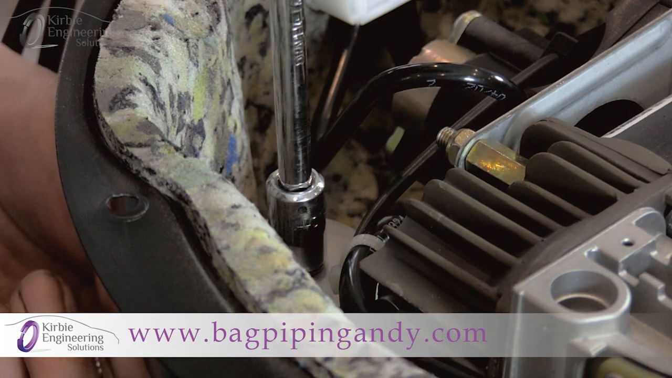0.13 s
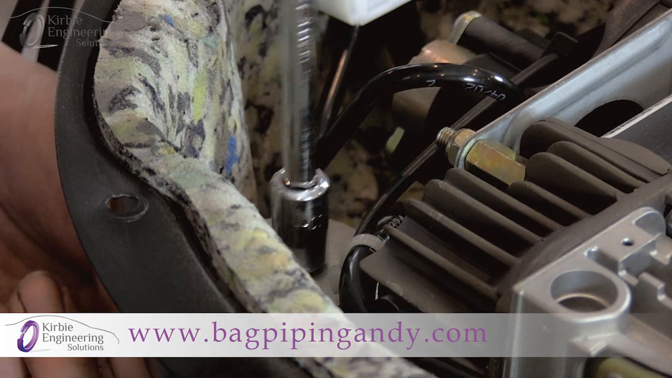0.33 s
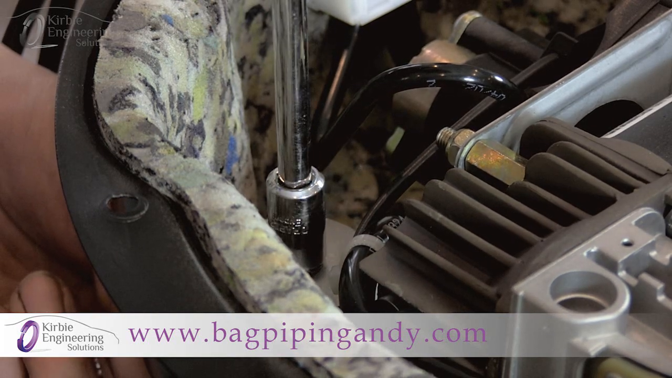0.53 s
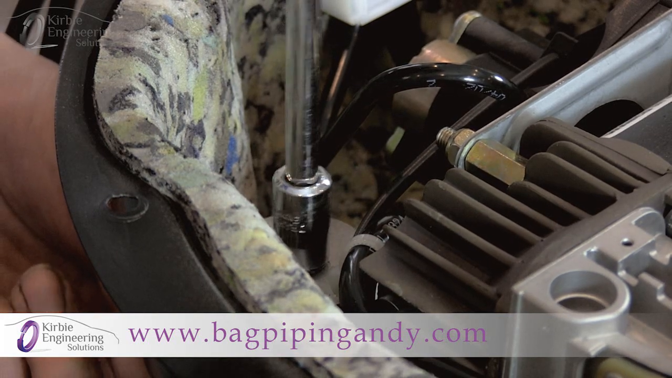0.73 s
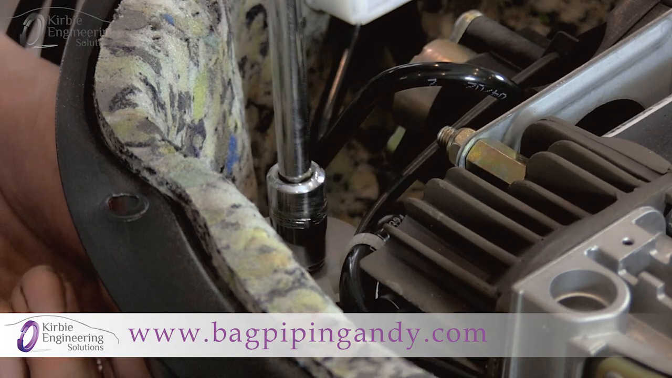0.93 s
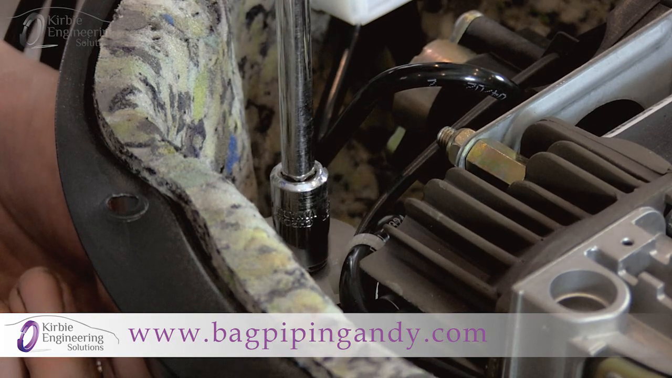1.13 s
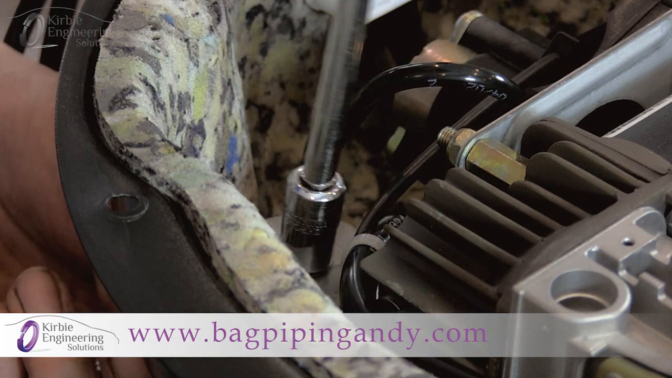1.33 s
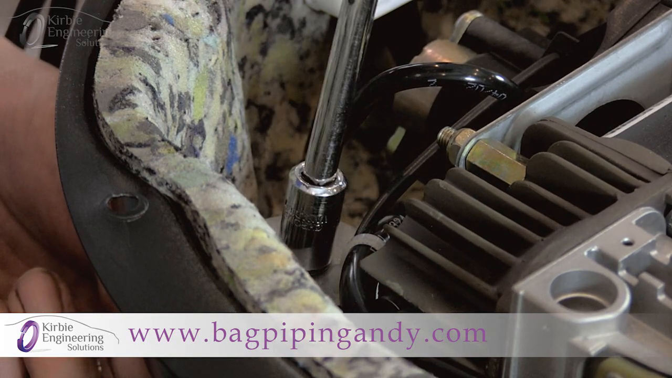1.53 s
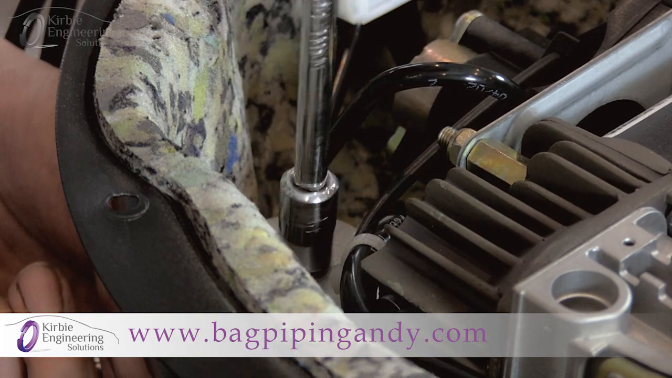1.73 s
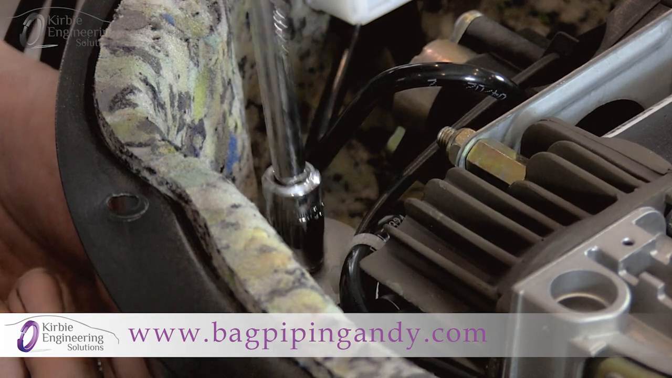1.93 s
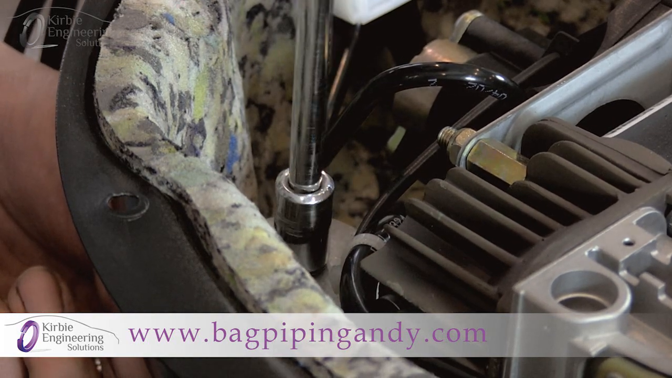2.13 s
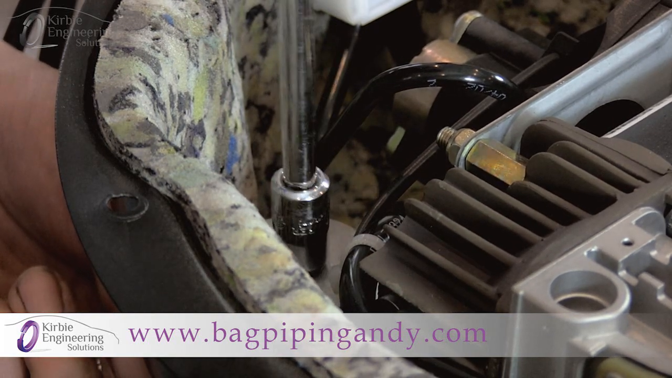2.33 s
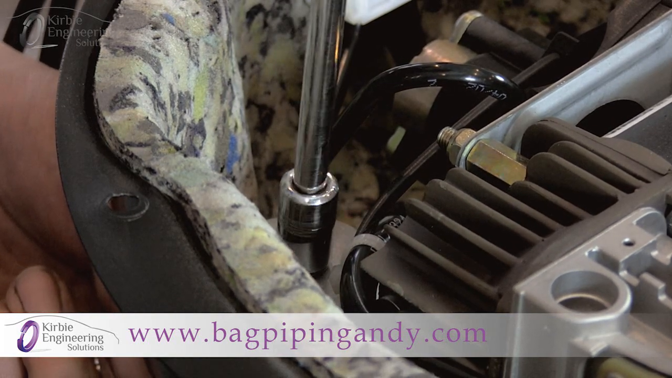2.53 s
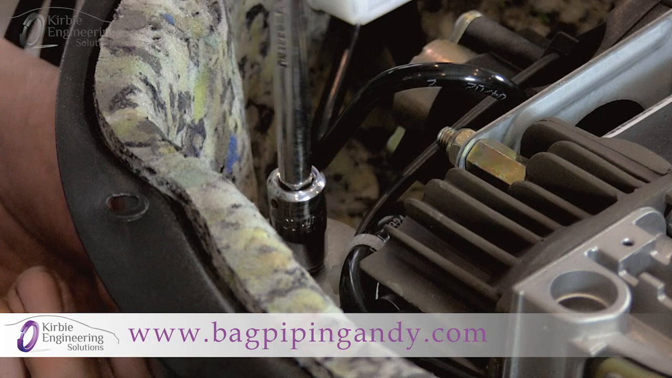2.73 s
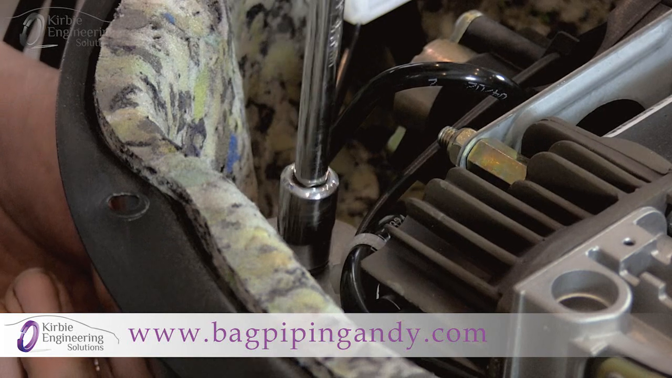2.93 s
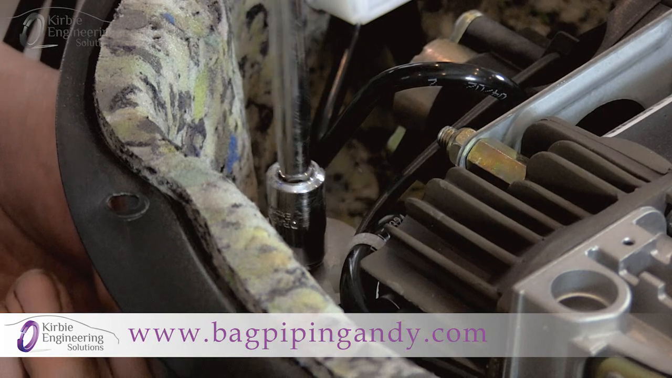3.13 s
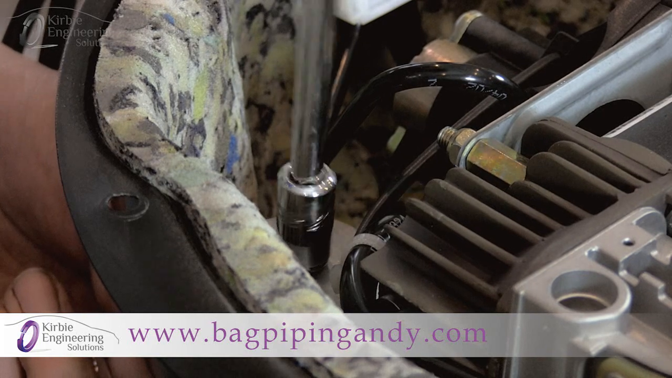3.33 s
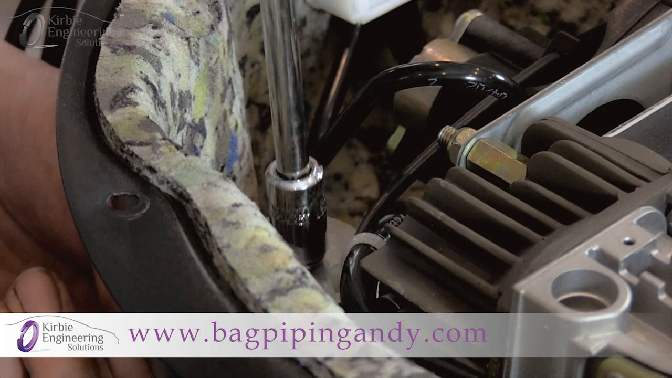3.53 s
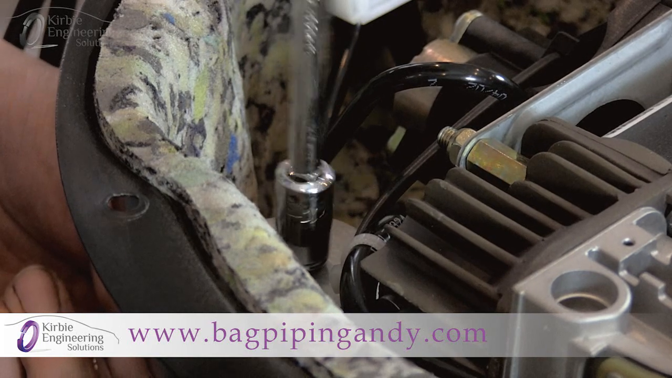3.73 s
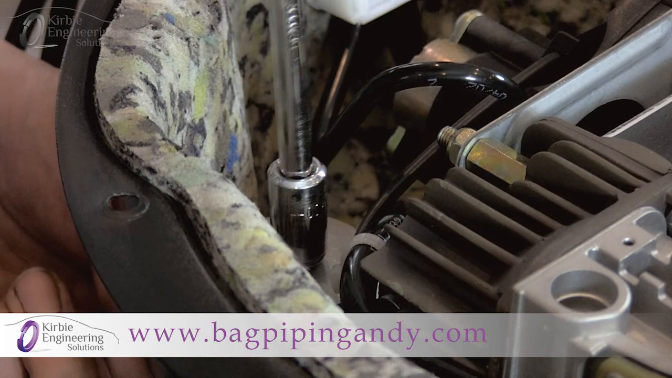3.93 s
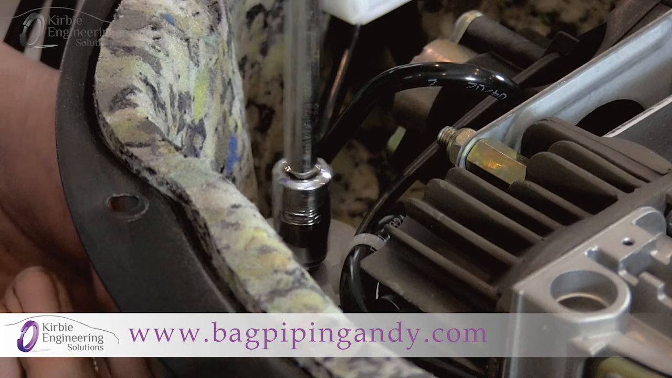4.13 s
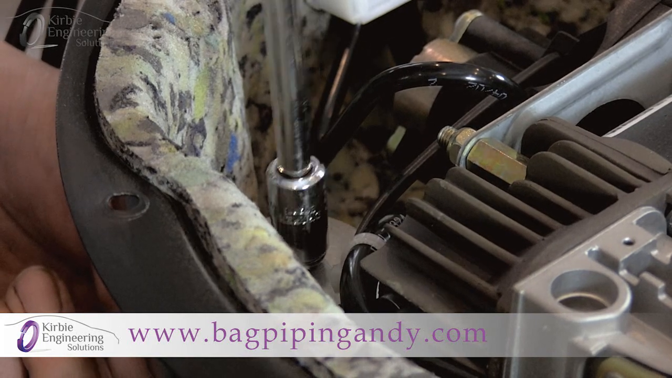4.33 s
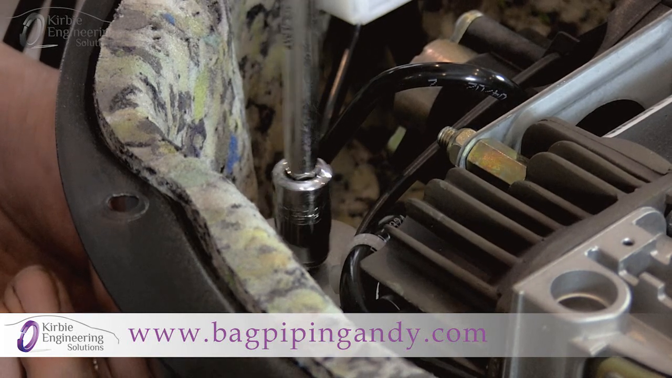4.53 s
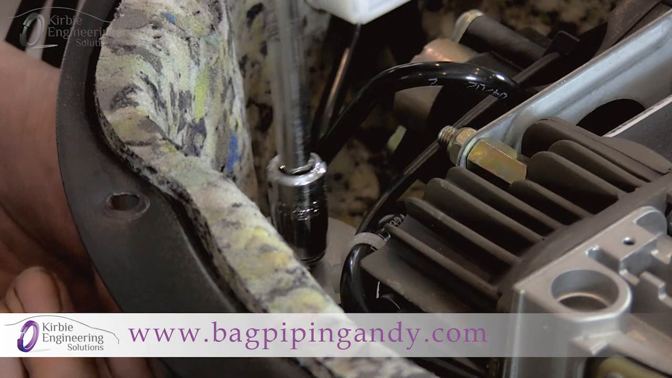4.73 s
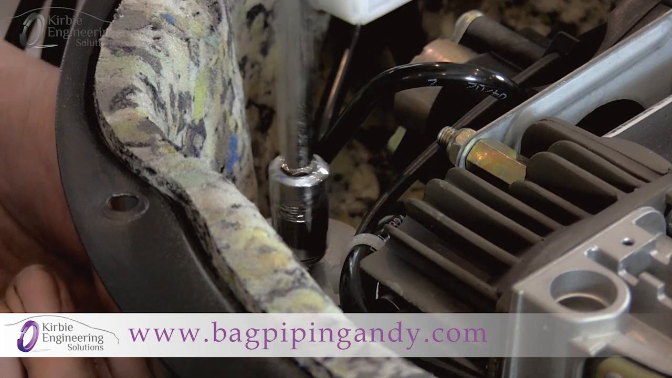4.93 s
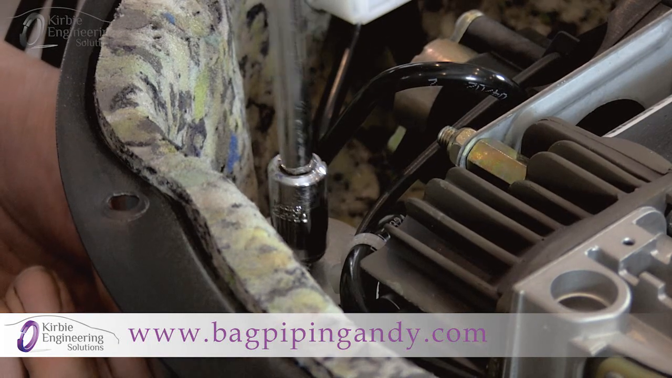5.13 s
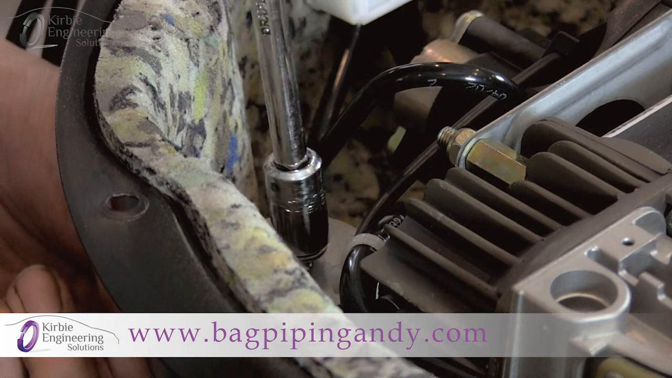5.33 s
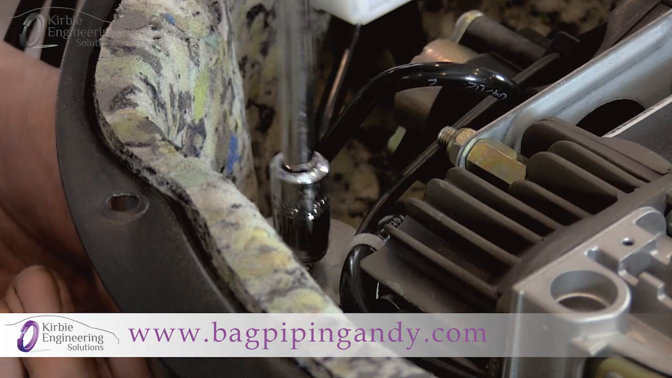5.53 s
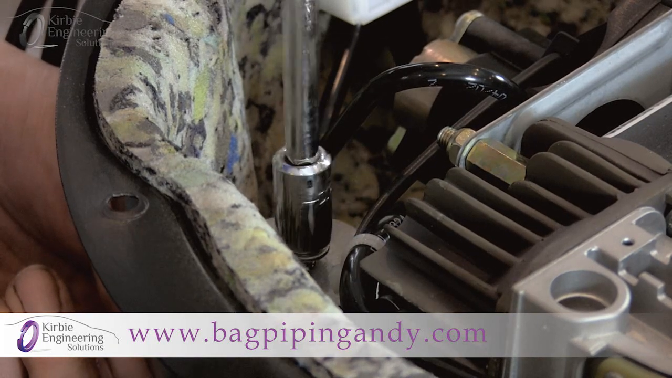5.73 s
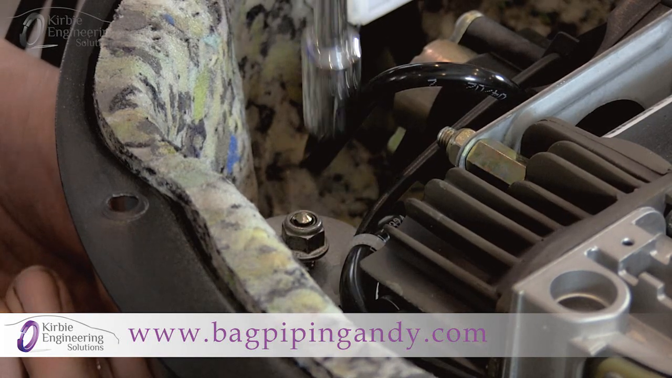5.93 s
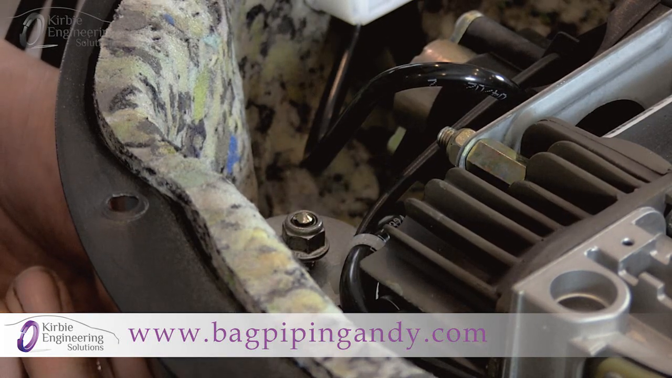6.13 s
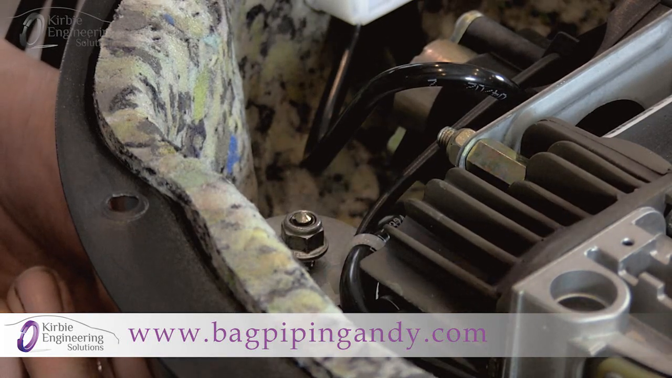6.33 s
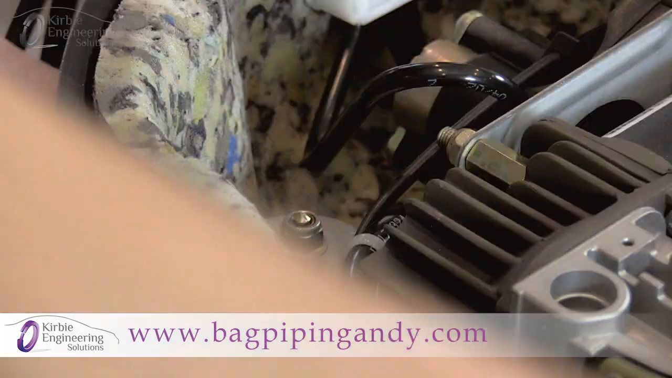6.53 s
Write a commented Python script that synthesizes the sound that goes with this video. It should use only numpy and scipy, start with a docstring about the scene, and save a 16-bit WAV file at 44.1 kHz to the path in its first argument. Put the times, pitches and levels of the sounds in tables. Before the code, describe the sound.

Bright metallic ratcheting in regular strokes, with small steel ticks and dull knocks, ending in one sharp clack in a small workshop.

```python
"""In a small workshop, a ratchet wrench on a long extension undoes a nut inside a steel housing.
On each back stroke the pawl, a small spring-loaded catch, rattles over the gear teeth and makes the
wrench head ring. Socket and bar tick as their slack is taken up; the socket scrapes on the nut and
finally pops off. The housing thuds and rumbles under the hand, and the room rings on over a faint hiss."""
import sys
import numpy as np
from scipy import signal
from scipy.fft import rfft, irfft
from scipy.io import wavfile

SR = 44100
rng = np.random.default_rng(int(sys.argv[2]) if len(sys.argv) > 2 else 0)


def store_wav(level_fs):
    """Save 16-bit WAV to argv[1]."""
    pcm = np.round(np.clip(np.atleast_2d(level_fs), -1, 1) * 32767)
    wavfile.write(sys.argv[1], SR, pcm.T.astype(np.int16))


N = 294147
LEAD = 13230   # extra samples before the start, dropped at the end

# Levels in the tables are relative. A "mode" is a natural ringing tone; t60 is its time to fade by 60 dB.
# Back strokes. The handle swings like a pendulum: phase 0 at rest, 90 fastest, 180 at rest again.
# first tooth t/s, last tooth t/s, tooth count, first phase/deg, last phase/deg,
# first level/dB, bend t/s, bend level/dB, last level/dB,
# middle modes level/dB, treble level/dB, upper over lower middle modes/dB, top modes boost/dB
# The clicks' loudness curve bends at the bend time; most are clipped to the stroke's first or last tooth.
BACK_STROKES = [(-.13, -0.031, 17, 29.3, 160, -16.5, 3.3, -16.5, -17, -6, -8, -2, 0),
                (0.2768, 0.3663, 14, 29, 156, -22.5, .343, -17.5, -20.5, -2.5, -9, 5.5, 4.5),
                (0.6972, 0.775, 12, 35.4, 166, -22.5, 3, -17, -19.5, -4, -9, 4.5, 6.5),
                (1.9426, 2.0551, 17, 30.8, 175, -17.5, 2.0, -18.5, -19.5, -3.5, -2, -0.5, 2),
                (2.3674, 2.46, 16, 36.4, 135.5, -22, 2, -16, -18.5, -2.5, -2.5, 6, -2),
                (2.766, 2.858, 17, 29.2, 158, -20.5, 2, -14.5, -20.5, -2, -3, 7.5, -2),
                (3.1456, 3.241, 17, 22.8, 155, -17.5, 2, -15, -21, -0.5, -2.5, 0.5, -3),
                (3.5358, 3.6201, 16, 31, 152, -19.5, 2, -17.5, -20, -3.5, -1.5, 2.5, -1.5),
                (3.9124, 4.0055, 18, 24.3, 150.7, -20, 2.5, -15.5, -19, -1, -4.5, 4.5, 1.5),
                (4.3141, 4.4198, 18, 24.7, 164, -17.5, 4, -15, -21.5, -2.5, -2.5, -2, 0),
                (4.7064, 4.8038, 19, 30.7, 151, -18, 7.5, -17.5, -19.5, -4, -2, 3, -1.5),
                (5.0792, 5.182, 19, 25, 148, -17, 5.5, -14.5, -22.5, -5, 1, 1.5, -6),
                (5.5157, 5.5818, 11, 63, 145, -18.5, 7, -22.5, -16.5, -2.5, -1.5, 6, -5)]
# Snap of the pawl: f/Hz, level/dB
PAWL_SNAP = [(350, -57.5), (600, -27.5), (1070, -19.5), (4010, -5), (4800, -7), (6250, -6), (7280, -11.5),
             (14600, -11.5), (15800, -15.5), (16500, -35.5)]
# Modes of the wrench head: f/Hz, level/dB, t60/s, left over right/dB, left phase lead/rad
HEAD_MODES = [(2066, -15, 0.015, 5.5, 2.5), (4010, -13, .006, 8.5, -0.5), (6222, -4, 0.019, 4.5, 0.17),
              (6450, -6, 0.01, 4, 1.54), (6530, -14, 0.0086, 12, 3.26), (8980, -10.5, 0.0058, 16.5, -0.7),
              (9676, -10.5, 0.0077, 14.5, 1.83), (11750, -11.5, 0.016, -0.5, -2),
              (12600, -10.5, .008, -6, -1.5), (14350, -6, 0.006, 2, -4.5)]
# Socket and bar taking up slack: t/s, level/dB, centre f/Hz
SLACK_TICKS = [(0.0665, -21, 4200), (0.2319, -26.5, 1800), (0.4628, -21, 4200), (0.6802, -32, 5600),
               (0.884, -20.5, 3970), (1.115, -42.5, 2496), (1.174, -44, 2470), (1.284, -48, 2500),
               (1.351, -45.5, 2880), (1.6503, -37, 2210), (1.6602, -31.5, 2150), (1.679, -42.5, 2000),
               (1.8502, -32.5, 2960), (1.908, -28.5, 2576), (1.931, -36, 7430), (2.246, -39, 3240),
               (2.3314, -26, 3040), (2.343, -36, 7000), (2.354, -31, 6500), (2.4713, -18.5, 4700),
               (2.5273, -29.5, 2040), (2.66, -35, 3000), (2.7302, -28, 1730), (2.911, -28, 2000),
               (2.9279, -23.5, 3720), (3.1075, -24, 1690), (3.2995, -22.5, 2770), (3.322, -31, 2200),
               (3.5047, -26, 2580), (3.678, -33, 2130), (3.6912, -22, 3020), (3.8725, -23, 1700),
               (4.071, -26.5, 5340), (4.268, -31.5, 3710), (4.297, -28, 5800), (4.4628, -18.5, 4360),
               (4.671, -31, 1920), (4.678, -38, 7000), (4.691, -38.5, 6510), (4.851, -30, 3800),
               (4.929, -32, 1500), (4.8628, -21.5, 2850), (5.0473, -32.5, 1710), (5.066, -30.5, 6500),
               (5.4804, -34.5, 3280), (5.497, -37.5, 4000), (5.757, -38, 7400), (5.8563, -41, 3570)]
# The socket dragging on the nut: t/s, level/dB
SCRAPE_LEVELS = [(1.7, -84), (2.2, -73), (2.6, -51), (3.3, -63.5), (4.0, -60), (5.9, -77)]
# Modes of the hollow socket: f/Hz, level/dB, t60/s
SOCKET_MODES = [(675, -4, 0.048), (996, 2, 0.021), (2390, 2, 0.013), (5000, 6.5, 0.0046)]
# Blows on the housing: t/s, upper modes level/dB, bass modes level/dB
HOUSING_BLOWS = [(0.074, -30, -42), (0.345, -23.5, -40), (0.468, -38, -42.5), (0.683, -35.5, -61),
                 (0.764, -27, -38.5), (0.885, -28, -47), (1.329, -45, -51), (1.653, -37.5, -48.5),
                 (1.908, -28.5, -37.5), (2.329, -34.5, -41), (2.432, -30, -51), (2.725, -30.5, -37.5),
                 (3.104, -34.5, -44.5), (3.196, -26.5, -48), (3.501, -40.5, -48.5), (3.872, -27, -37.5),
                 (4.381, -30, -55.5), (4.441, -29.5, -34), (4.668, -40, -49.5), (4.83, -32.5, -43),
                 (5.043, -38, -40), (5.545, -36.5, -35), (5.608, -31.5, -44), (6.589, -53.5, -56.5)]
# Modes of the housing: f/Hz, level/dB, t60/s
HOUSING_MODES = [(98, -11, 0.13), (149, -1, 0.05), (193, -3, 0.021), (265, -11.5, 0.072), (378, 0, 0.036),
                 (473.2, 3.5, 0.034), (526.5, -7, 0.06), (645, -10.5, 0.029)]
# Hand and socket rubbing the housing: t/s, level/dB
RUB_LEVELS = [(0.0, -34), (0.95, -49.5), (1.56, -63), (2.03, -47.5), (3.55, -35), (4.27, -55.5),
              (4.55, -40), (5.52, -41.5), (6.06, -71), (6.67, -65)]
# How long the room rings: f/Hz, t60/s
ROOM_DECAY = [(300, 0.9), (800, 0.92), (2100, 0.51), (5500, 0.55), (14600, 0.28)]
# Sound reaching the walls, compared with the direct sound: f/Hz, level/dB
WALL_TONE = [(300, 1.5), (2500, 0), (5000, -1), (6300, -2.5), (8000, 0.5), (14000, 0.5)]
# Stereo width of scattered sound: f/Hz, side over mid/dB
STEREO_WIDTH = [(100, -16.5), (700, -42), (3800, -64.5), (5500, -5), (9000, -3), (15000, 3.5)]
# Background rumble and hiss: f/Hz, level/dB
HISS_TONE = [(12, -21), (20, -11), (51, -4), (75, -16), (1140, -33.5), (1240, -37.5), (1510, -36.5),
             (7100, -39.5), (15200, -42.5), (16500, -46)]
# Stereo width of the hiss: f/Hz, side over mid/dB
HISS_WIDTH = [(60, -13), (600, -5.5), (1400, -10), (7000, 1)]

CHATTER_S, CHATTER_DB = .002, -8   # the pawl bounces briefly after landing
TOOTH_SPREAD_DB, TOOTH_SPREAD_S = 1.6, .0003   # no two teeth are cut alike
THIN_DB, THIN_S, THIN_HZ = -7.5, .0079, 3500   # strokes start thin: loss, time to fill out, upper edge


def gear_teeth():
    """Teeth are evenly spaced, so they click slowly at the ends of a swing and fast in its middle."""
    times, level_db, stroke_age = [], [], []
    for first, last, count, phase_0, phase_1, first_db, bend, bend_db, last_db, *_ in BACK_STROKES:
        phases = np.radians([phase_0, phase_1])
        positions = np.linspace(*np.cos(phases), round(count))
        t = np.interp(np.arccos(positions), phases, [first, last])
        bend = np.clip(bend, first, last)
        times += list(t)
        stroke_age += list(t - first)
        level_db += list(np.interp(t, [first, bend, last], [first_db, bend_db, last_db]))
    luck = rng.standard_normal((len(times), 2))
    gains = amp(level_db + TOOTH_SPREAD_DB * luck[:, 1])
    return times + TOOTH_SPREAD_S * luck[:, 0], gains, np.array(stroke_age)


def pawl_snap(times, gains, stroke_age):
    """The pawl lands on each tooth with a thin, bright click, then bounces."""
    _, treble_db, _, _ = stroke_tone()
    clicks = strikes(times, gains)
    rattle = chatter(clicks, CHATTER_S, CHATTER_DB) - clicks
    side_rattle = chatter(clicks, CHATTER_S, CHATTER_DB + 1) - clicks
    contact = amp(6.5) * cut(clicks, 1, 5000, "high")
    side = colour(colour(side_rattle, PAWL_SNAP), STEREO_WIDTH)
    snap = stereo(colour(contact + rattle, PAWL_SNAP), side)
    treble = cut(snap, 2, 7400, "high")
    body = cut(snap, 1, THIN_HZ, "low")
    thin_db, = in_time(np.transpose([times, THIN_DB * np.exp(-stroke_age / THIN_S)]))
    return amp(12) * (snap + (amp(treble_db) - 1) * treble + (amp(thin_db) - 1) * body)


def head_ring(times, gains, wander_db=2.5, held_t60_s=.016):
    """Each tooth shakes the head's modes, whose strengths wander along the gear; the pawl damps them."""
    middle_db, treble_db, tilt_db, top_db = stroke_tone()
    drift = signal.lfilter([.6], [1, -.8], rng.standard_normal((len(times), len(HEAD_MODES))), axis=0)
    rings = 0
    for k, (hz, mode_db, t60, pan_db, lead) in enumerate(HEAD_MODES):
        if 5500 < hz < 7400:   # the middle modes
            tone_db = middle_db + np.sign(hz - 6250) * tilt_db / 2
        else:
            tone_db = treble_db * (hz > 7400) + top_db * (hz > 10500)
        clicks = strikes(times, gains * amp(mode_db + wander_db * drift[:, k]))
        shaken = chatter(clicks, CHATTER_S, CHATTER_DB - 7)
        mode = amp(tone_db) * ring(shaken, hz, min(t60, held_t60_s))
        left = amp(pan_db / 2) * (mode * np.exp(1j * lead)).imag
        rings = rings + np.array([left, amp(-pan_db / 2) * mode.imag])
    left, right = cut(rings, 2, 1500, "high")   # a small head sends out no bass
    side = cut(left - right, 8, 5000, "high")   # lower tones from close by reach both sides alike
    return stereo(left + right, side) / 2


def slack_ticks(fade_s=.0051):
    """Socket and bar knock steel on steel: each tick is a short rattle around one pitch."""
    out, length = np.zeros((2, N + LEAD)), round(.03 * SR)
    fade = np.exp(-np.arange(length) / SR / fade_s)
    for t, tick_db, hz in SLACK_TICKS:
        mid, side = rng.standard_normal((2, length)) * fade
        tone = [(500, -22), (hz / 2, -5), (hz, 0), (hz * 1.4, -8), (2.8 * hz, -20), (16000, -28)]
        mid, side = colour(mid, tone), colour(colour(side, tone), STEREO_WIDTH)
        start = round(t * SR) + LEAD
        out[:, start:start + length] += amp(tick_db + 10) * stereo(mid, side) / np.sqrt(np.sum(mid ** 2))
    return out


def socket_scrape(grains_per_s=1500):
    """The socket drags on the nut: many tiny clicks make a gritty sound."""
    grit = rng.standard_normal(N + LEAD) * (rng.random(N + LEAD) < grains_per_s / SR)
    return amp(in_time(SCRAPE_LEVELS)[0]) * rms_one(ring(grit, hz=2100, t60=.0038).imag)


def socket_pop(at_s=5.9302):
    """The socket comes off the nut with a crack, and its hollow rings."""
    pop = strikes([at_s], .58)
    rattle = chatter(pop, CHATTER_S / 2, CHATTER_DB + 2.5)
    crack = colour(rattle, [(500, -38), (1500, 7.5), (4500, 9), (12000, -7)])
    hollow = sum(amp(mode_db) * ring(pop, hz, t60).imag for hz, mode_db, t60 in SOCKET_MODES)
    return amp(-19) * crack + amp(-34.5) * hollow


def housing(tooth_times, gains, uneven_db=4.5):
    """Loose blows, jolts from the pawl and rubbing set the housing's low modes ringing."""
    times, upper_db, bass_db = np.transpose(HOUSING_BLOWS)
    luck = rng.standard_normal((len(times), len(HOUSING_MODES)))
    grip = rms_one(signal.lfilter([1], [1, -.9995], rng.standard_normal(N + LEAD)))   # catches and slips
    rub = amp(in_time(RUB_LEVELS)[0] - 43 + uneven_db * grip) * rng.standard_normal(N + LEAD)
    jolts = strikes(tooth_times, amp(-31) * gains * rng.standard_normal(len(gains)))
    out = 0
    for k, (hz, mode_db, t60) in enumerate(HOUSING_MODES):
        push_db = bass_db - .5 if hz < 250 else upper_db - 12.5
        hits = strikes(times + .003, amp(push_db + 2 * luck[:, k]))
        blows = chatter(hits, fade_s=.0087, bounce_db=-18.5)
        out = out + amp(mode_db) * ring(blows + jolts + rub, hz, t60).imag
    return cut(out, 2, [70, 900], "band") * amp([[.4], [-.4]])   # slightly to the left


def room_echo(sound, early_db=7.5, early_s=.013):
    """Echoes blur into noise that fades band by band; nearby surfaces answer first and loudest."""
    t = np.arange(round(.8 * SR)) / SR
    edges_hz = 60 * 2 ** np.arange(0, 8.6, .5)
    tails, noise = 0, rng.standard_normal((2, 2, len(t)))
    for k, (low, high) in enumerate(zip(edges_hz, np.minimum(edges_hz[1:], .45 * SR))):
        hz = np.sqrt(low * high)
        band = cut(noise[k % 2], 2, [low, high], "band")
        fade = amp(-60 * t / at_hz(ROOM_DECAY, hz))
        tails = tails + band * fade * amp([[0], [at_hz(STEREO_WIDTH, hz)]])
    tails *= 1 - np.exp(-t / .005)   # the first echoes need time to arrive
    tails *= amp(early_db * np.exp(-t / early_s))
    tails /= np.sqrt(np.sum(tails[0] ** 2))
    return stereo(*[signal.oaconvolve(sound, tail)[:len(sound)] for tail in tails])


def hiss(level_db=-60):
    """Steady room rumble and faint microphone hiss."""
    mid, side = (colour(noise, HISS_TONE) for noise in rng.standard_normal((2, N + LEAD)))
    return amp(level_db) * stereo(mid, colour(side, HISS_WIDTH)) / np.std(mid)


def stroke_tone():
    """The last four stroke columns as curves gliding from one stroke to the next."""
    return in_time([((first + last) / 2, *rest[-4:]) for first, last, *rest in BACK_STROKES])


def strikes(times, gains):
    """One click at each time."""
    out = np.full(N + LEAD, 1e-18)
    np.add.at(out, np.round(np.asarray(times) * SR).astype(int) + LEAD, gains)
    return out


def chatter(clicks, fade_s, bounce_db):
    """Follow each click with a short burst of noise: its tiny bounces."""
    t = np.arange(round(4 * fade_s * SR)) / SR
    shape = signal.oaconvolve(np.abs(clicks), np.exp(-(t / fade_s) ** 2))[:len(clicks)]
    return clicks + amp(bounce_db) * shape * rng.standard_normal(len(clicks))


def ring(x, hz, t60):
    """One mode: each click starts a fading sine wave, found in the result's .imag part."""
    return signal.lfilter([1], [1, -amp(-60 / (t60 * SR)) * np.exp(2j * np.pi * hz / SR)], x)


def colour(x, spectrum):
    """Shape the tone to follow rows of f/Hz, level/dB."""
    hz = np.maximum(np.arange(2049) * SR / 4096, 1)
    cepstrum = irfft(at_hz(spectrum, hz) * np.log(10) / 20)
    cepstrum[1:2048] *= 2
    cepstrum[2049:] = 0   # so nothing sounds ahead of its click
    return signal.oaconvolve(x, irfft(np.exp(rfft(cepstrum))))[:len(x)]


def cut(x, order, hz, keep):
    """Keep the "low", "high" or "band" part; a higher order cuts more steeply."""
    return signal.sosfilt(signal.butter(order, hz, keep, fs=SR, output="sos"), x)


def in_time(rows):
    """Turn rows that start with t/s into one curve for each other column."""
    times, *columns = np.transpose(rows)
    return [np.interp((np.arange(N + LEAD) - LEAD) / SR, times, column) for column in columns]


def at_hz(rows, hz):
    """Look up a frequency, with octaves evenly spaced."""
    freqs, values = np.transpose(rows)
    return np.interp(np.log(hz), np.log(freqs), values)


def stereo(mid, side):
    """Left and right from what they share (mid) and what sets them apart (side)."""
    return np.array([mid + side, mid - side])


def amp(db):
    """Decibels to gain."""
    return 10 ** (np.asarray(db) / 20)


def rms_one(x):
    """Scale to an average power of 1."""
    return x / np.sqrt(np.mean(x ** 2) + 1e-20)


def scene():
    """Mix the wrench, the housing, their echo and the hiss."""
    times, gains, stroke_age = gear_teeth()
    snap = pawl_snap(times, gains, stroke_age)
    rings = head_ring(times, gains)
    clatter = snap + slack_ticks() + socket_scrape() + socket_pop() + housing(times, gains)
    to_walls = (clatter + amp(-4.5) * rings).sum(axis=0)   # the head beams its ring at the listener
    echo = amp(-11.5) * room_echo(colour(to_walls, WALL_TONE))
    return (clatter + rings + echo + hiss())[:, LEAD:]


def record(dry, cutoff_hz=17100):
    """Cut off the highest treble steeply."""
    return signal.sosfilt(signal.cheby2(12, 60, cutoff_hz, fs=SR, output="sos"), dry)


dry = scene()
out = record(dry)
store_wav(out)
```